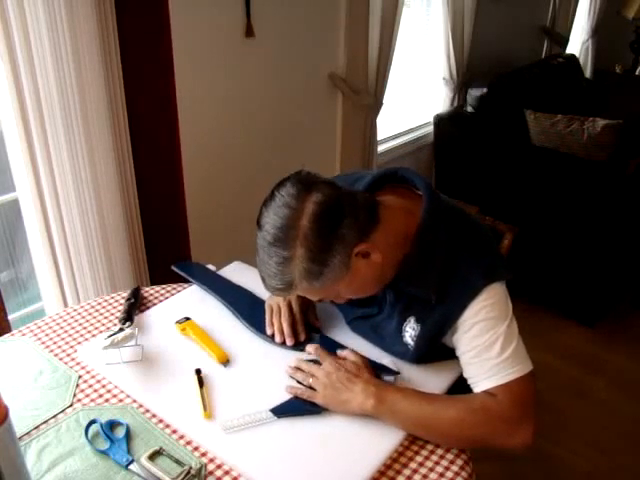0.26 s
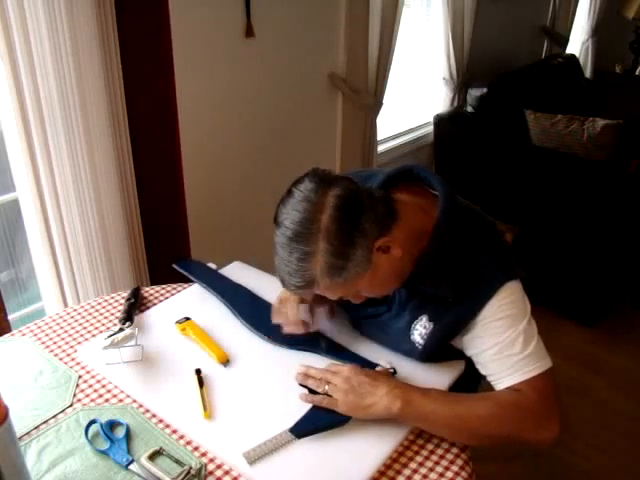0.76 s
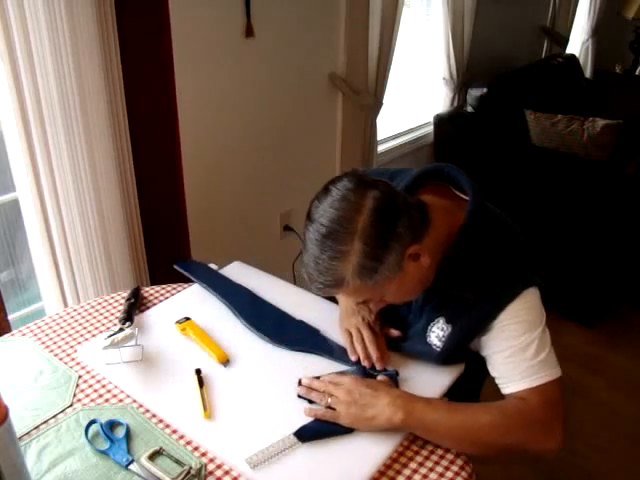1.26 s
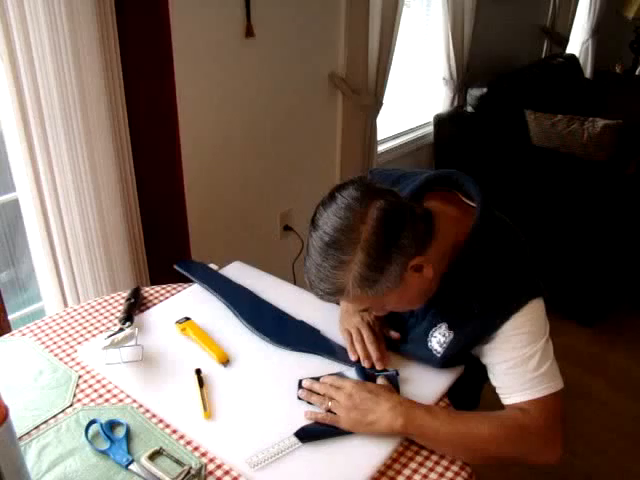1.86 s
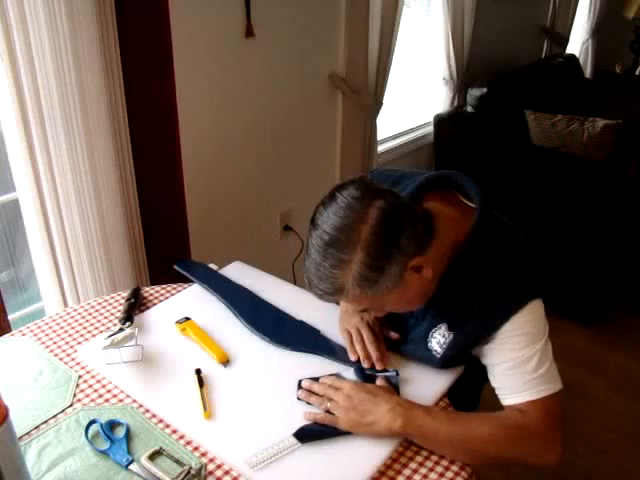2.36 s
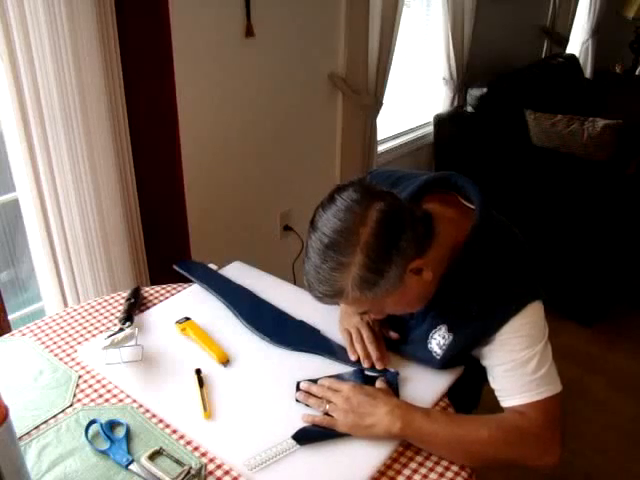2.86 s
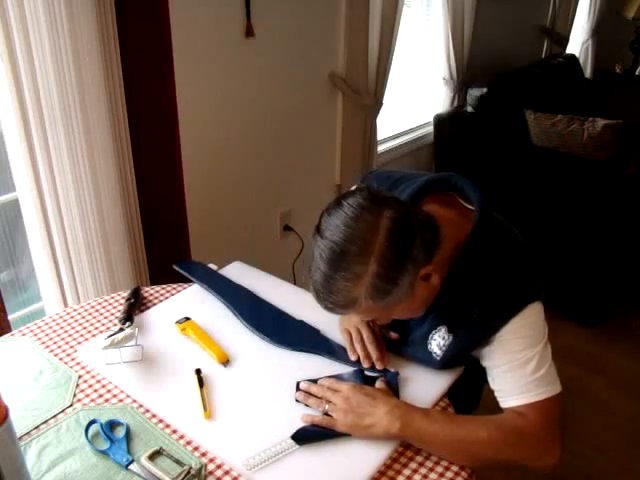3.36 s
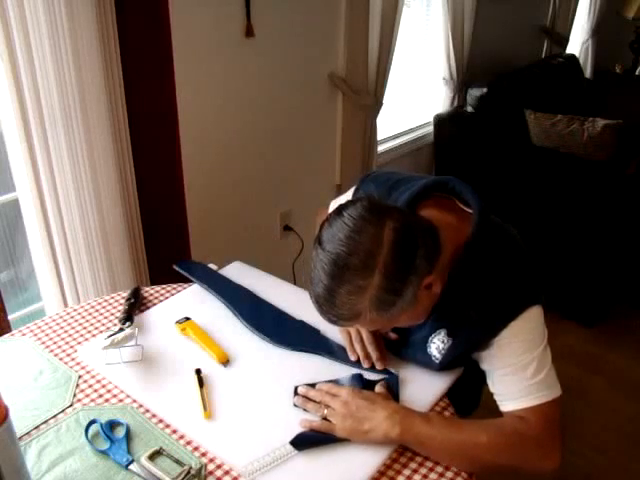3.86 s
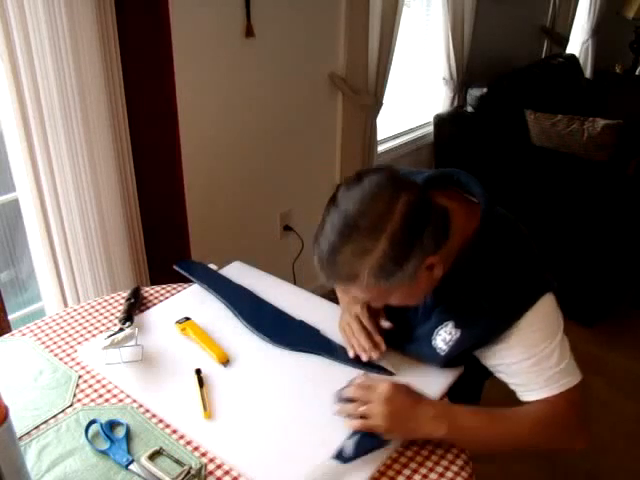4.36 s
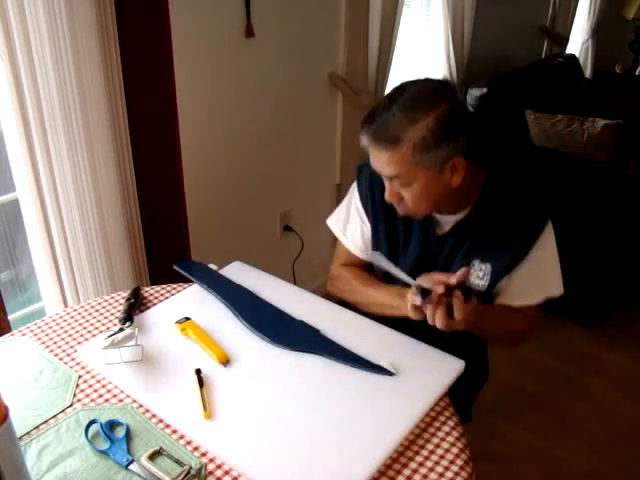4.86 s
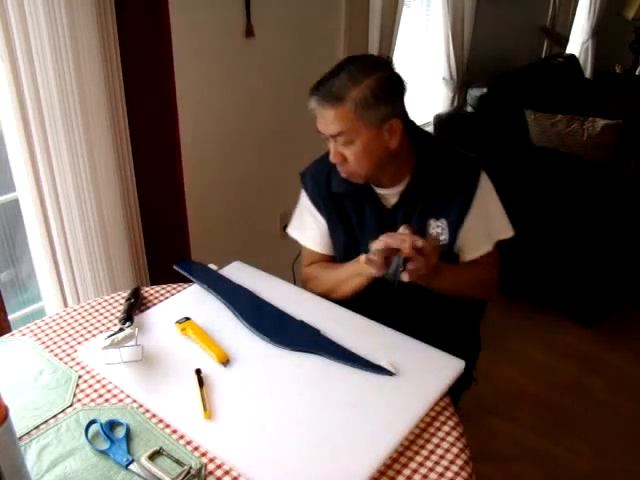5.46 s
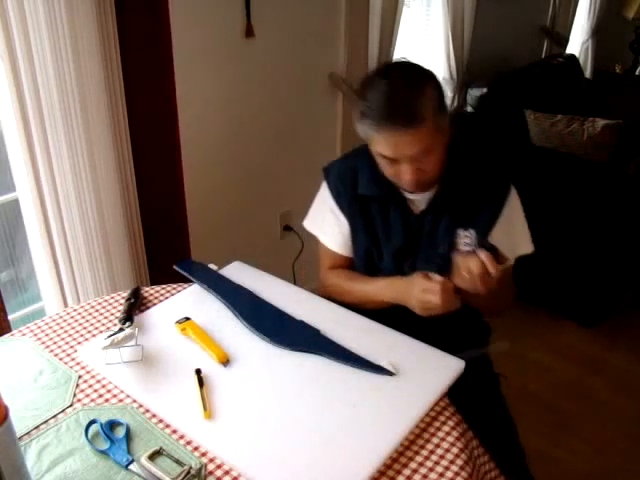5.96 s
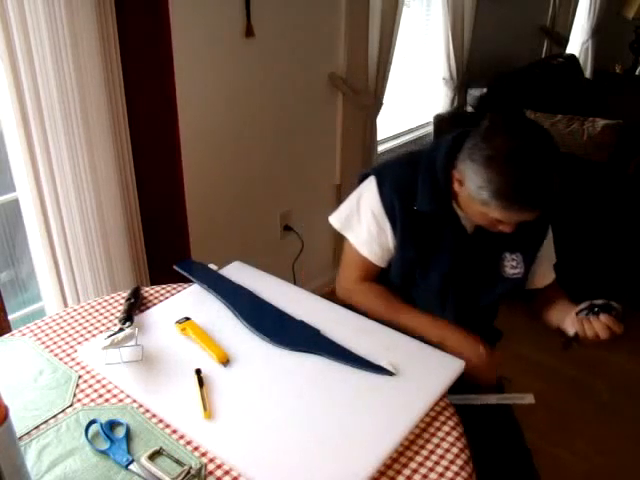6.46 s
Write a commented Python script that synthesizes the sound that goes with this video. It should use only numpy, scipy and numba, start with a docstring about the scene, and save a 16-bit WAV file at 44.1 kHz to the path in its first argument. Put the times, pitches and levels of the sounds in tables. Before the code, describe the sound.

A few hard cracks come early, one very loud, then sparse ticks and thin crinkling, another crack, and a quiet pause. Then cracks come fast and stiff film crumples in bright, lively bursts for over a second before nearly stopping. A microphone in a hard-walled room catches short echoes, soft table knocks, low hum and hiss, with slightly muffled top and automatic level ducking.

```python
"""Sharp snaps and dense crackle ring briefly and echo round a bare room, over a faint motor hum and air.
Hands work a blade and a strip of stiff tape over a foam sheet on a table, then crumple the strip.
Snaps are bursts of clicks through a resonance; crackle is clumped clicks in three bands; thuds are short
pushes; the hum is wavering sines and the air is coloured noise.
The camera's gain control ducks everything, hum included, while the crackle is loud."""
import sys
import numpy as np
from scipy import signal
from scipy.fft import rfft, irfft
from scipy.io import wavfile
from scipy.ndimage import uniform_filter1d, minimum_filter1d
from numba import njit

SR = 44100
rng = np.random.default_rng(int(sys.argv[2]) if len(sys.argv) > 2 else 0)


def volts_from_db(level):
    """Convert decibel levels to linear amplitude ratios."""
    exponent = np.asarray(level, float) / 20
    return 10 ** exponent


def log_audio(samples):
    """Write samples as a 16-bit WAV file to the path given in sys.argv[1]."""
    # one column per channel
    frames = np.atleast_2d(samples).T
    # limit to full scale, then quantise
    limited = np.clip(frames, -1, 1)
    pcm = np.round(limited * 32767).astype(np.int16)
    wavfile.write(sys.argv[1], SR, pcm)


N = 295470  # length in samples

# bright part of snaps and crackle: band edges [Hz]; snaps use the lower edge only
BRIGHT_HZ = (5680, 9660)


def band(x, hz, order=2):
    """Band-pass between two edges."""
    return signal.sosfilt(signal.butter(order, hz, "band", fs=SR, output="sos"), x)


def unit(x):
    """Scale to rms 1."""
    return x / np.sqrt(np.mean(x ** 2))


def walk(rate):
    """Random levels held 1 / rate s and slewed twice; spread near 1."""
    hold = int(SR / rate)
    steps = np.repeat(rng.standard_normal(N // hold + 1), hold)
    return 1.177 * uniform_filter1d(uniform_filter1d(steps, hold), hold)[:N]


def clicks(size, rate, spread_db):
    """Random tiny fractures, rate per second; some are several times bigger than the rest."""
    happens, bigness, polarity = rng.random((3, size))
    sizes = volts_from_db(np.minimum(-spread_db * np.log(1 - bigness), 3 * spread_db))
    return (happens < rate / SR) * sizes * np.sign(polarity - .5)


def causal(gain):
    """Minimum-phase response with the given gain per bin."""
    ceps = irfft(np.log(gain))
    ceps[1:len(ceps) // 2] *= 2
    ceps[len(ceps) // 2 + 1:] = 0
    return irfft(np.exp(rfft(ceps)))


def snaps():
    """Each snap is a flurry of breaks that swells for a moment, peaks in one crack and dies, with its own colour."""
    # snaps of blade and tape: (time [s], level [dB], ring [Hz], ring sharpness [Q],
    # dull voice of the sheet re ring [dB])
    snap_table = [(0.1361, -28, 3860, 2.5, -19), (0.3596, -29, 2240, 1.2, -18), (0.4122, -16, 6500, 1.3, 6),
                  (0.4212, -0.5, 4560, 1.13, -6.5), (0.5682, -11, 5040, 1.9, 0),
                  (0.5735, 6, 3310, 2.1, -8.5), (0.823, -9, 3380, 2.1, -5), (1.0054, -24, 4350, 2.1, -2),
                  (1.0893, -24.5, 4350, 1.1, -18), (1.1662, -23, 2310, 0.86, 1),
                  (1.255, -20, 1580, 1.8, -16), (1.3181, -15.5, 4830, 1.8, -4), (1.6431, -27, 8350, 1.7, 3),
                  (1.9324, -27, 4000, 1.2, -0.5), (2.1236, -12, 6740, 0.8, -30),
                  (2.6555, -1.5, 4180, 1.4, -12), (2.7001, -14.5, 4860, 1.5, -11),
                  (3.7147, -31, 7400, 1.5, -18), (3.8315, -25, 3870, 1.4, -3),
                  (3.9556, -6, 6900, 0.57, -11), (4.0013, -9.5, 5530, 0.39, 0),
                  (4.0217, 2.5, 4300, 1.64, 0), (4.2879, -23, 2230, 0.88, -8),
                  (4.3107, -7.5, 4500, 0.94, -2.5), (4.3469, -7.5, 2640, 1.9, -3),
                  (4.3649, -3, 4370, 3.9, -3), (4.416, -6, 6940, 0.78, -2), (4.466, -10, 1900, 2.5, -1),
                  (4.574, -8.5, 1930, 3.3, 6), (4.6399, -8, 4550, 0.82, -10), (4.7234, -7, 4400, 2.3, -5),
                  (4.8423, -6.5, 3500, 1.1, -13), (4.913, -2, 3230, 1.9, -25), (4.9716, -1, 4520, 2.2, -27),
                  (5.1051, -5, 5500, 0.53, -9), (5.2033, -1.5, 5500, 0.87, -4), (5.3742, -12, 6860, 2, -7),
                  (5.492, -15, 3680, 1.6, -3), (5.5242, -6, 4940, 1.9, -11.5),
                  (5.658, -2.5, 4500, 2.7, -4.5), (5.763, -3.5, 4900, 1.6, -15),
                  (6.117, -13.5, 5700, 1.2, -6), (6.2057, -18.5, 2300, 1.5, -8),
                  (6.331, -15.5, 8500, 1, -2.5)]
    sheet_low_hz, sheet_high_hz = 1370, 2580  # the dull voice of the sheet
    body_hz, body_db = 547, -9.5  # the voice reaches weakly down to here, re the dull voice
    fade_ms, bright_db = 10.7, -9.5  # how long a snap lasts; its bright edge re ring
    crest = 3.5  # nominal peak over rms within a snap
    size, lead = 4096, SR // 200  # samples in a snap, and ahead of its crack

    t = np.arange(size) / SR
    before, after = np.minimum(t - lead / SR, 0), np.maximum(t - lead / SR, 0)
    swell = np.exp(before / 0.00031)
    fade = np.exp(-(1000 * after / fade_ms) ** 2)

    # power responses over frequency
    f = np.linspace(1, SR / 2, 257)
    dull = 1 / (1 + (sheet_low_hz / f) ** 10) / (1 + (f / sheet_high_hz) ** 8)
    dull += volts_from_db(2 * body_db) / (1 + (body_hz / f) ** 6) / (1 + (f / sheet_low_hz) ** 6)
    bright = 1 / (1 + (BRIGHT_HZ[0] / f) ** 4)

    out = np.zeros(N + size)
    for s, db, hz, q, dull_db in snap_table:
        push = 0.31 * unit(clicks(size, rate=9000, spread_db=5.0)) * swell * fade
        push[lead] += 1  # the one crack
        ring = 1 / (1 + (q * (f / hz - hz / f)) ** 2) ** 2
        power = ring + volts_from_db(2 * dull_db) * dull + volts_from_db(2 * bright_db) * bright + 1e-6
        snap = signal.fftconvolve(push, causal(np.sqrt(power)))[:size]
        rms = np.std(snap[lead:lead + int(fade_ms * SR / 1000)])
        out[int(s * SR) - lead:][:size] += volts_from_db(db) * snap / (crest * rms)
    return out[:N]


def rustle():
    """Stiff film creasing: dense clicks in clumps, with crinkles that start hard and die in a few ms."""
    # one list for each stretch of handling: (time [s], level [dB], tilt towards the bright part [dB])
    stretches = [
        [(0.0, -49.5, 0), (0.198, -48.5, -5), (0.4, -52.5, -1.5)],
        [(0.9, -50.5, 4.5), (1.04, -53, -10), (1.354, -46.5, -3.5), (1.526, -46.5, -4.5), (1.63, -78, 11),
         (1.644, -46.5, 5), (1.93, -50, 5), (2.014, -62, 0), (2.11, -48, -1)],
        [(4.414, -27, -2.5), (4.546, -43, -9.5), (4.686, -25, -0.5), (4.836, -26, 1), (5.102, -26, 2.5),
         (5.278, -22, 0.5), (5.466, -35, -0.5), (5.544, -23, 0), (5.72, -26, 2.5), (5.794, -21.5, 1.5),
         (5.922, -23.5, 0.5), (6.05, -50.5, -4), (6.138, -41.5, 5), (6.318, -57, -6), (6.328, -46, 3),
         (6.504, -53, -4), (6.7, -57.5, 4)],
    ]
    dull_hz, mid_hz = (1163, 2690), (2800, 5330)
    dull_db, bright_db = -2.5, -1  # re the middle, at no tilt
    crinkle_depth = 1.1

    t = np.arange(N) / SR
    creases = np.abs(clicks(N, rate=90, spread_db=1.8))
    crinkles = signal.lfilter([1], [1, -np.exp(-1 / (.005 * SR))], creases)  # 5 ms decay
    film = clicks(N, rate=3000, spread_db=3.5) * (1 + crinkle_depth * crinkles)
    # the crackle is evened out to a steady rms over a twentieth of a second
    film /= np.sqrt(uniform_filter1d(film ** 2, SR // 20))

    def part(hz):
        """One band of the crackle, with its own click polarities and its own wavering level."""
        # every click's colour differs from the last, as its polarity is drawn afresh in each band
        flipped = film * rng.choice([-1, 1], N)
        return unit(band(flipped, hz)) * volts_from_db(2.5 * walk(30))

    mid, dull, bright = part(mid_hz), part(dull_hz), part(BRIGHT_HZ)
    out = np.zeros(N)
    for rows in stretches:
        s, db, tilt_db = np.transpose(rows)
        tilt = np.interp(t, s, tilt_db)
        on = np.clip(np.minimum(t - s[0], s[-1] - t) / .002, 0, 1)  # 2 ms fades at both ends
        colour = mid + volts_from_db(dull_db - tilt) * dull + volts_from_db(bright_db + tilt) * bright
        out += on * volts_from_db(np.interp(t, s, db)) * colour
    return out


def response():
    """Direct sound, a few hard echoes, then a diffuse tail that builds over some milliseconds."""
    # first echoes off table and near walls, each time varied by up to 15 %: (delay [ms], level [dB])
    echo_table = [(2.5, -11.5), (4.6, -8), (12.5, -10.5)]
    # decay of the room tail by band: (frequency [Hz], time to fall by 60 dB [s])
    tail_table = [(700, 1), (1500, 0.72), (3500, 0.56), (7000, 0.49)]
    tail_db = -5  # energy of the whole tail re the direct sound

    t = np.arange(SR * 3 // 4) / SR
    tail = np.zeros(len(t))
    for hz, t60 in tail_table:
        noise = band(rng.standard_normal(len(t)), (hz / 1.79, hz * 1.405))
        tail += noise * volts_from_db(-60 * t / t60)
    tail *= 1 - np.exp(-t / 0.004)
    out = volts_from_db(tail_db) * tail / np.sqrt(np.sum(tail ** 2))
    out[0] += 1
    for ms, db in echo_table:
        out[int(ms * rng.uniform(.85, 1.15) * SR / 1000)] += volts_from_db(db)
    return out


def room(x, count=10):
    """Sound is shared at random among several room responses, so echoes and tails stay diffuse."""
    step = SR // 500  # average time between random draws of a response, 2 ms
    turn = np.cumsum(rng.random(N) < 1 / step)
    chosen = rng.integers(0, count, N)[turn]
    out = np.zeros(N)
    for k in range(count):
        share = uniform_filter1d(1. * (chosen == k), step // 2).clip(0)
        out += signal.fftconvolve(x * np.sqrt(share), response())[:N]
    return out


def thuds():
    """The table top thuds when leant on or knocked: each is one short blunt push."""
    # (time [s], peak level [dB])
    thud_table = [(0.581, -27.5), (2.66, -37), (3.959, -36.5), (4.001, -32.5), (4.02, -27), (4.419, -40),
                  (4.667, -31.5), (5.209, -42)]
    width_ms = 1.3  # from the peak to 1/e of it
    ms = 1000 * np.arange(N) / SR
    return sum(volts_from_db(db) * np.exp(-((ms - 1000 * s) / width_ms) ** 2) for s, db in thud_table)


def motor():
    """Hum partials that waver in level and a little in pitch as they cross the room."""
    # partials of the far motor about which they waver: (frequency [Hz], rms level [dB])
    partials = [(193.8, -60.5), (236.9, -52.5), (296.1, -56.5), (468.3, -54), (532.9, -60), (710.6, -61.5)]
    waver_db, pitch_waver = 3.2, 0.00809  # spread of level; spread of pitch as a fraction
    out = np.zeros(N)
    for hz, db in partials:
        level = np.sqrt(2) * volts_from_db(db + waver_db * walk(24))
        phase = 2 * np.pi * np.cumsum(hz * (1 + pitch_waver * walk(7.2))) / SR
        out += level * np.sin(phase)
    return out


def air():
    """Room air and microphone hiss: smooth noise coloured by a spectrum."""
    # shape of the spectrum, whatever its overall level: (frequency [Hz], relative density [dB])
    spectrum = [(15, -55), (25, -35), (70, -20.5), (102, -14), (160, -14), (239, 1.5), (264, -7),
                (292, -2.5), (384, -2), (532, -4), (948, -8.5), (1280, -15.5), (10000, -27.5), (13000, -89),
                (22000, -120)]
    level_db = -45  # rms
    hz, db = np.transpose(spectrum)
    f = np.maximum(np.arange(N // 2 + 1) * SR / N, 1)
    gain = volts_from_db(np.interp(np.log(f), np.log(hz), db))
    noise = irfft(rfft(rng.standard_normal(N)) * gain, N)
    return volts_from_db(level_db) * unit(noise)


def scene():
    """Handling sounds in the room, with table thuds, over the steady background."""
    handling = room(snaps() + rustle())
    return (handling + thuds() + motor() + air())[None]


@njit
def follow(x, attack, release):
    """Level detector that closes a fraction of the gap per sample, one going up and another coming down."""
    y, e = np.empty(len(x)), 0.
    for i in range(len(x)):
        a = abs(x[i])
        e += (a - e) * (attack if a > e else release)
        y[i] = e
    return y


def low_pass(x):
    """Removes everything above the highest recorded frequency."""
    return signal.sosfilt(signal.butter(12, 11370, fs=SR, output="sos"), x)


def record(dry):
    """Slow gain control leans on long loud stretches, the top is cut and a quick limiter holds the peaks."""
    duck_above_db, top_hz = -30, 10050
    # the detector takes 1.1 s to rise and 0.25 s to fall
    level = follow(dry[0], 1 / (1.1 * SR), 1 / (.25 * SR))
    gain = np.minimum(1, (volts_from_db(duck_above_db) / (level + 1e-9)) ** .95)
    cut = signal.sosfilt(signal.ellip(10, .3, 75, top_hz, fs=SR, output="sos"), dry * gain)
    span = SR // 400  # limiter smoothing, 2.5 ms
    limit = minimum_filter1d(np.minimum(1, .92 / (np.abs(cut) + 1e-9)), 2 * span)
    mix = cut * uniform_filter1d(uniform_filter1d(limit, span), span)
    return low_pass(mix)


dry = scene()
out = record(dry)
log_audio(out)
```